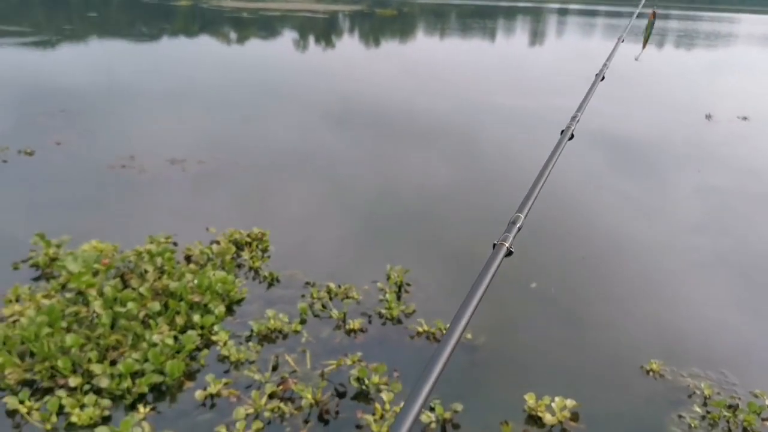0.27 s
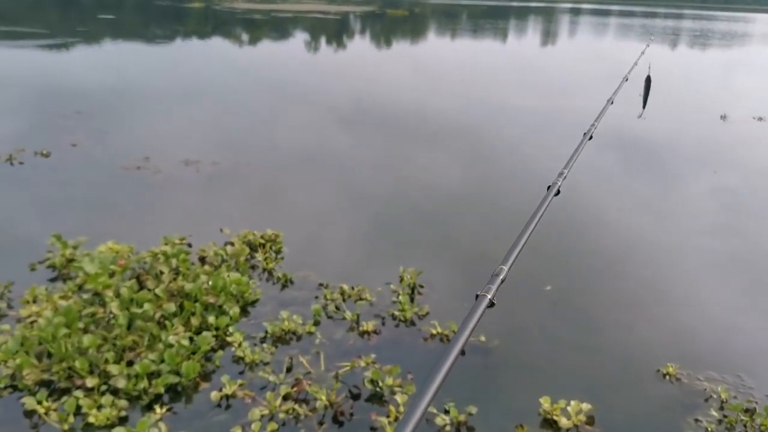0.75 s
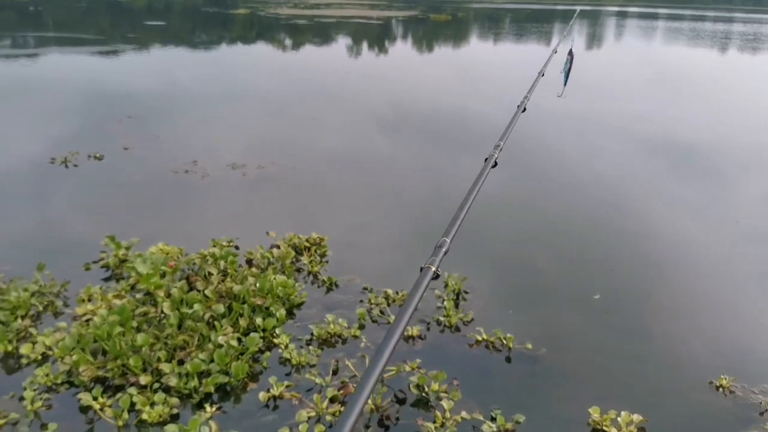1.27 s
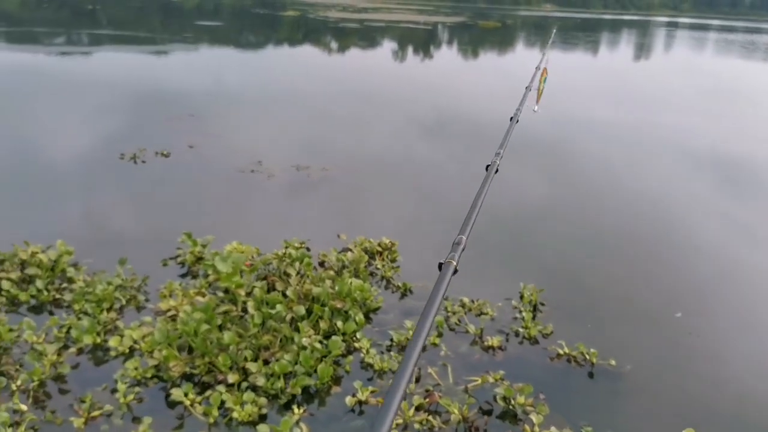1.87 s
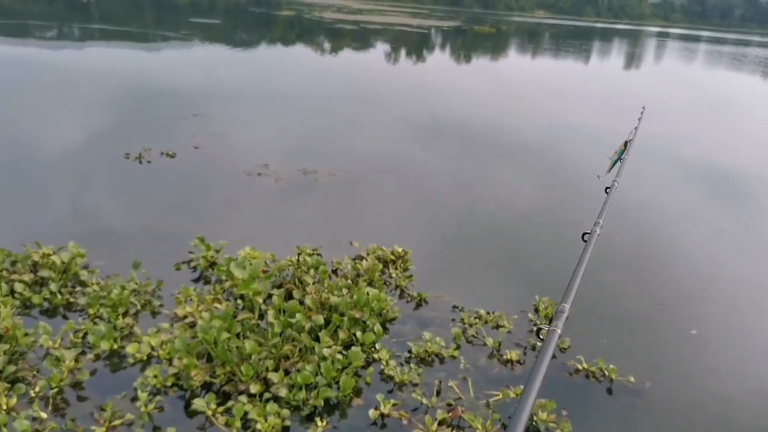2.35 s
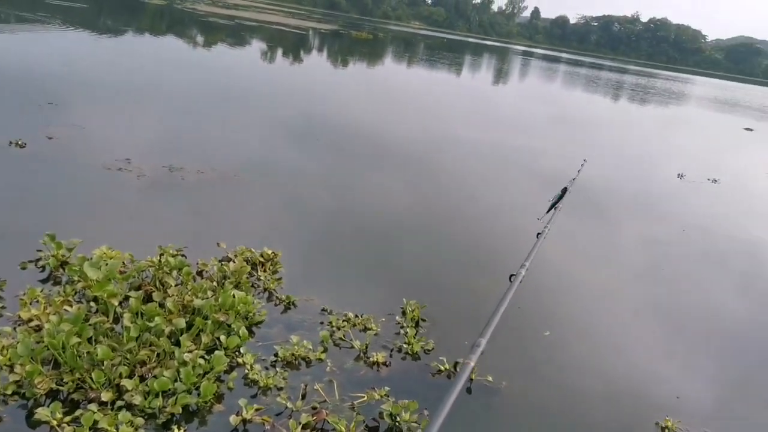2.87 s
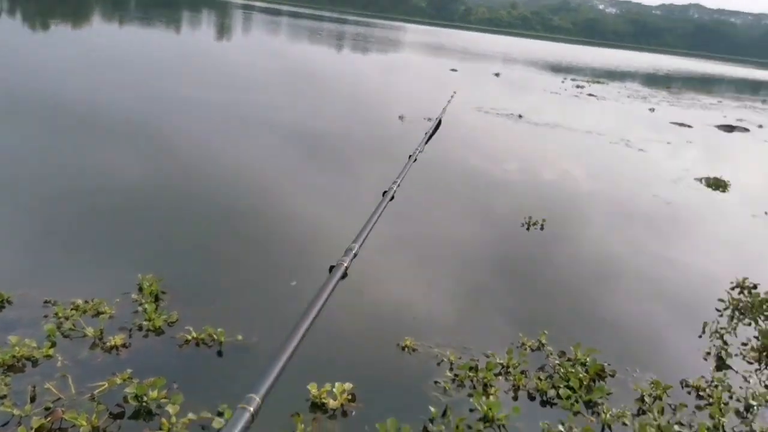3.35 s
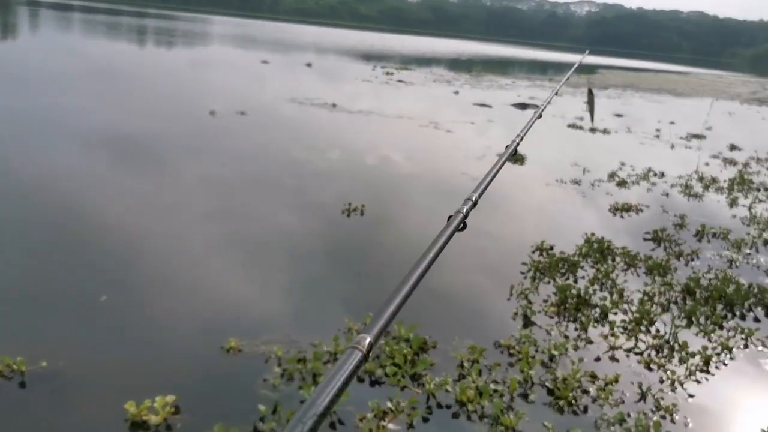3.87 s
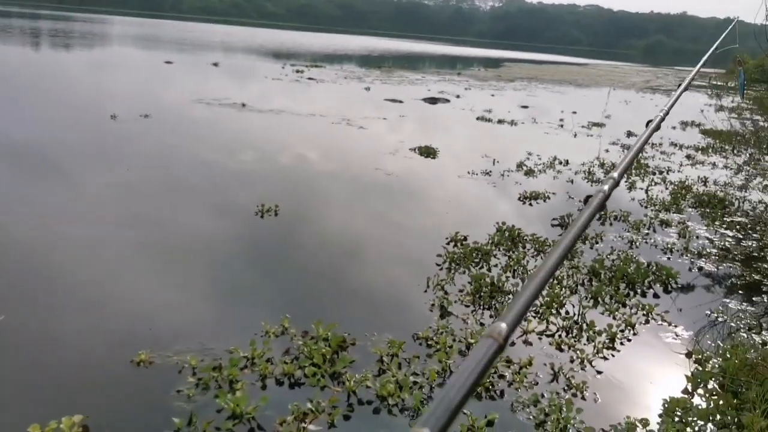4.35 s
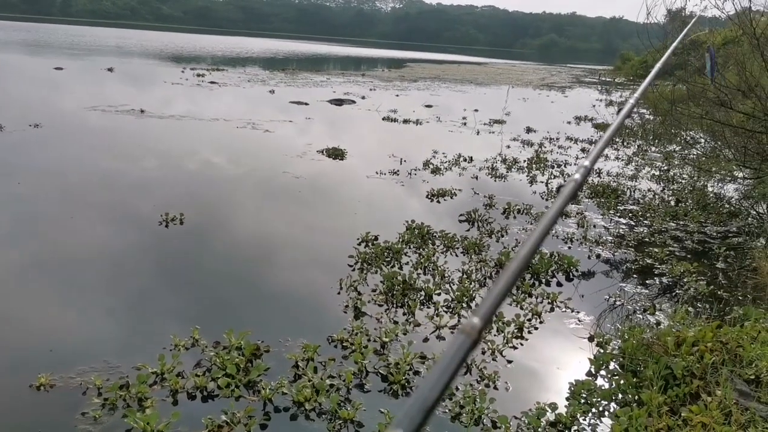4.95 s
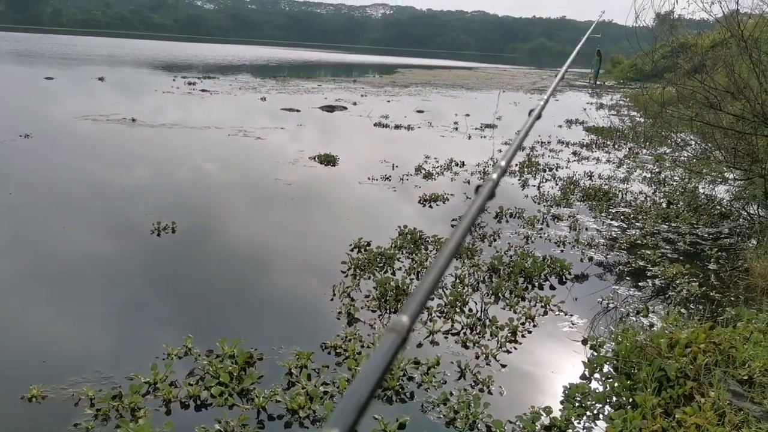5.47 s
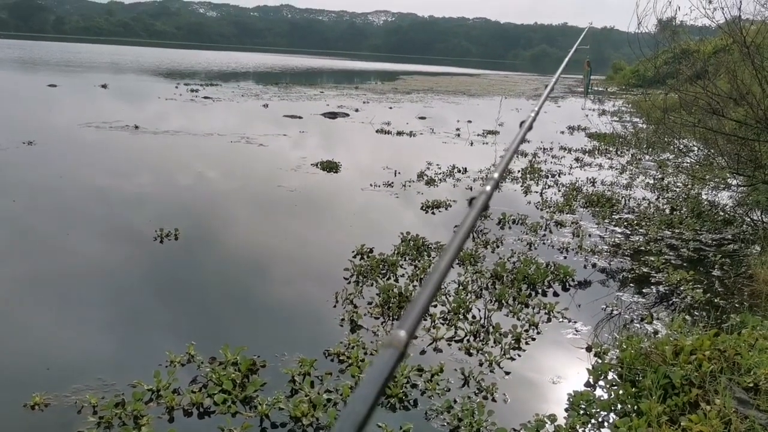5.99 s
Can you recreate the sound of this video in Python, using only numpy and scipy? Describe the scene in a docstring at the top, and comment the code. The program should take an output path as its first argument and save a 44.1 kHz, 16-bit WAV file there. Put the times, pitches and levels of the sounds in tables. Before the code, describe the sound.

Quiet lakeshore insect hum with a fast cricket trill, brief bird whistles and fishing-rod ticks, then a sharp clack, soft camera bumps and dry creaking.

```python
"""A still lake shore, heard at the two ports of a small camera worn by an angler who slowly turns right. From
the start a cricket chirps over throbbing, buzzing katydids (toothy wing noise in narrow bands), an engine drone
(wavering sine orders), air and breeze (filtered noise); clothing rubs, tackle ticks (struck modes) and birds
whistle (gliding sines). Later the left reeds fade, soft bumps knock the camera body and a cicada drone rises;
then bouts of buzzing come from the right, a bird clicks (short ringing tones) and the camera mount creaks."""
import sys
import numpy as np
from scipy import signal
from scipy.fft import rfft, irfft
from scipy.io import wavfile
from scipy.ndimage import uniform_filter1d

SR = 44100
rng = np.random.default_rng(int(sys.argv[2]) if len(sys.argv) > 2 else 0)


def master_out(mix):
    """Clip the mix to full scale and print it as 16-bit PCM to the path in sys.argv[1]."""
    frames = np.transpose(np.atleast_2d(mix))
    ceiling = np.clip(frames, -1, 1)
    pcm = np.round(ceiling * 32767).astype(np.int16)
    wavfile.write(sys.argv[1], SR, pcm)


def volts(x):
    """Linear amplitude factor 10**(x/20) for a level x in dB, scalar or array-like."""
    e = np.asarray(x, float) / 20
    return 10 ** e


N = 274302
T = np.arange(N) / SR

# cricket's pace, near 25 chirps a second: start_s, chirps_sung
CHIRP_COUNT = [(0, .86), (.75, 19.21), (1.25, 32.0), (2.25, 57.25), (3.25, 80.95), (4, 99.9), (5, 124.29),
               (6, 149.17), (6.22, 154.51)]
# crickets: start_s, near_level_db, chorus_level_db
CRICKET_LEVELS = [(0, -63.5, -70), (.4, -65, -68), (.67, -69, -68), (.83, -59.5, -70), (1.35, -57.5, -71),
                  (1.91, -60.5, -79), (2.23, -66, -70), (2.56, -67.5, -72), (2.85, -66, -70),
                  (3.15, -62, -67), (3.5, -65.5, -65.5), (3.84, -71.5, -66), (4.19, -67, -71.5),
                  (4.4, -61, -72.5), (4.7, -58, -66.5), (4.94, -61, -74), (5.3, -60, -69),
                  (5.6, -60, -64.5), (6.1, -60.5, -73.5), (6.14, -76, -72), (6.22, -78, -66)]
# wing strokes of a chirp, before variation: place_in_chirp (0-1), nominal_length_s, top_pitch_hz, relative_db
CRICKET_STROKES = [(.33, .009, 5180, 0), (.63, .0095, 5220, 0), (.92, .009, 4900, -10)]
# left katydid's pace: start_s, throbs_sung
THROB_COUNT = [(0, .01), (.5, 3.75), (2.25, 18.47), (3, 24.95), (4, 33.36), (5, 41.99), (5.5, 46.57),
               (6.22, 52.82)]
# left reeds, fading as the camera turns: start_s, throbbing_db, left_port_buzz_db, right_port_buzz_db
REED_LEVELS = [(0, -66, -65.5, -84), (.66, -64, -65, -87), (1.4, -58.5, -63, -93),
               (1.96, -58.5, -64.5, -93), (2.87, -55, -65, -89), (3.15, -55.5, -68.5, -85),
               (3.43, -63.5, -68.5, -85), (4.04, -69, -72.5, -89), (4.28, -64, -70, -86),
               (4.5, -65, -71.5, -77), (4.8, -64, -73, -89), (4.95, -70, -73.5, -85),
               (5.25, -64.5, -73, -84), (5.85, -71, -73, -79), (6.22, -66, -73.5, -85)]
# steady katydid: start_s, level_against_left_buzz_db
STEADY_LEVEL = [(0, 3), (1.9, 3.5), (2.4, -4), (3.3, -7), (4.4, -5), (5.2, 0), (6.22, 1)]
# right katydid: start_s, level_db
RIGHT_KATYDID_LEVEL = [(0, -75), (1.2, -74), (1.3, -100), (4.8, -100), (5, -80), (6.22, -82.5)]
# far engine: start_s, firing_hz, level_db, second_order_relative_db
ENGINE_COURSE = [(0, 102.1, -52, -12), (.8, 102.6, -50, -23), (1.7, 104.7, -56.5, -11),
                 (2.6, 105.7, -57.5, -13.5), (3.1, 103.6, -60, -12), (3.5, 91.97, -53, -17),
                 (3.9, 77.75, -56, -6), (4.4, 75.2, -62.5, -3), (5, 86.74, -52, -9.5),
                 (5.5, 88.73, -52, -10), (6.22, 90.2, -54.5, -2.5)]
# engine's half orders: multiple_of_firing, relative_db
HALF_ORDERS = [(1.5, -11), (2.5, -13.5)]
# steady far tone, one row: pitch_hz, level_db
FAR_HUM = (396, -67.5)
# colour of far land and air: frequency_hz, relative_density_db (per Hz)
AIR_COLOUR = [(45, -6.5), (65, -2.5), (104, -1), (153, -6), (330, -8), (450, -14.5), (620, -18),
              (1100, -26.5), (1700, -29), (3700, -33), (4600, -37.5), (5500, -60)]
# loudness of that air: start_s, level_db
AIR_LEVEL = [(0, -48), (.33, -49.5), (.73, -52), (2.3, -53), (3.3, -54), (4.4, -54.5), (5.2, -54.5),
             (6.22, -52.5)]
# likeness of the air at the two ports: frequency_hz, left_right_correlation (before clipping to 0-1)
AIR_LIKENESS = [(60, 1), (300, 0.54), (700, 0), (1400, 0)]
# breeze on the ports: start_s, level_db
BREEZE_LEVEL = [(0, -53), (.14, -70), (.42, -52.5), (.71, -76), (1.0, -71), (1.92, -64), (3.2, -65),
                (3.43, -70), (4.04, -53.5), (4.68, -54.5), (5.1, -50), (5.4, -53), (5.63, -57), (5.87, -53),
                (6.0, -56), (6.22, -59)]
# steady treble hiss of the microphones: frequency_hz, left_density_db, right_density_db (dB per Hz)
MIC_HISS = [(4200, -120, -120), (5200, -113, -115), (6100, -120, -122), (6560, -110, -113),
            (6830, -113, -118), (7960, -116, -118), (9350, -115, -116), (11800, -117, -115),
            (12600, -128, -119), (15100, -130, -121), (15500, -140, -135)]
# rubs of clothing: start_s, hold_s, low_level_db, middle_relative_db, left_minus_right_db
CLOTH_RUBS = [(.2, .1, -69, -21, -9), (.52, 0.14, -72, -1.5, -12), (.71, 0.025, -68.5, -3, -10),
              (0.868, 0.027, -74, -20, -11), (1.178, 0.1, -60, -19, -2.5), (1.502, 0.12, -87, -10, 0),
              (1.72, .02, -70, -4, -7), (1.92, 0.11, -70, -11, 1), (2.079, 0.22, -58, -29, -1),
              (2.376, 0.08, -62.5, -15, -1), (2.497, 0.015, -60, -18, -1), (2.591, 0.038, -59.5, -21, 0.5),
              (2.7, 0.17, -72.5, -8, -1), (3.12, 0.52, -76.5, -7, 1), (3.676, 0.13, -67, -6, -1),
              (3.937, 0.078, -64, -20, -1), (4.07, 0.53, -74, -2, -1), (4.87, 0.018, -69, -13, -4),
              (5.032, 0.2, -68.5, -2, -5), (5.317, .05, -65.5, -3, -4), (5.45, .26, -71.5, 1, 0),
              (5.803, 0.15, -72, -0.5, -1), (6.119, .1, -71.5, 2, -2)]
# scrapes of line and reel: peak_s, middle_db, treble_db, rise_s, fall_s (size of the time for 20 dB)
LINE_SCRAPES = [(.05, -83, -73, .05, 0.3), (1.23, -63, -82, 0.033, -0.37), (2.61, -69, -73, .02, .06),
                (3.86, -48.5, -52, 0.017, .013), (3.91, -59.5, -74, 0.035, 0.17),
                (4.835, -51, -53, .1, .03), (4.851, -33, -35.5, 0.022, .011)]
# rod and reel modes: nominal_hz, free_t60_s, relative_db, group (0 body, 1 shell, 2 edge)
ROD_MODES = [(460, 0.03, -10, 0), (893, 0.03, 3, 0), (1047, 0.042, -1.5, 0), (1640, 0.0035, 6.5, 1),
             (2240, 0.0069, 3.5, 1), (2650, 0.0098, -5.5, 1), (3400, 0.0067, -5, 1), (3960, 0.013, -11, 1),
             (6400, 0.0032, 12, 2), (7240, 0.0032, 2, 2), (10660, 0.0061, 1.5, 2)]
# ticks: start_s, body_db, shell_db, edge_db, left_minus_right_db
TACKLE_TICKS = [(.092, -47, -63, -70, -4), (.102, -52, -65, -75, -3), (.147, -53, -70, -73, -12),
                (.519, -55, -50, -76, -7), (.591, -54, -49.5, -74, -8), (.707, -42.5, -35.5, -66, -6),
                (.725, -45, -25, -61, -4.5), (1.211, -49, -52, -65, 4), (1.22, -52, -33.5, -68, -6),
                (1.731, -51, -54, -73, -2), (2.094, -51, -65, -74, 6), (2.101, -47.5, -63, -72, 7),
                (2.377, -52.5, -71, -71, 5), (2.443, -34, -55, -70, 4), (2.503, -53, -45, -68, 2),
                (2.588, -59, -60, -70, 3), (2.611, -46, -57, -53, 8), (2.629, -54, -41, -62, -3),
                (3.729, -64, -54, -81, -1.5), (3.753, -48, -52, -74, -3), (3.787, -53, -68, -71, -6),
                (3.845, -69, -62, -55, -1), (3.857, -50.5, -36.5, -38, -6), (4.336, -62, -68, -80, -2),
                (4.783, -70, -56, -54, 0), (4.795, -70, -50, -48, 0), (4.81, -70, -52, -48, 0),
                (4.845, -56, -40, -44, -4), (4.847, -48, -31, -30, 5), (4.852, -48, -29, -40, -5),
                (5.022, -53, -39.5, -81, -6)]
# falling whistle: start_s, pitch_hz, level_db
FALLING_WHISTLE = [(0.1, 2120, -87), (0.14, 2020, -58), (0.238, 1642, -58), (0.334, 1337, -69),
                   (0.375, 1240, -76)]
# notes of the fluttering bird: start_s, length_s, first_hz, last_hz, top_level_db
WARBLER_NOTES = [(.55, .03, 2750, 2910, -67), (0.581, .02, 2240, 2030, -63), (.985, 0.026, 2910, 2510, -72),
                 (1.032, 0.022, 2640, 2750, -72), (1.06, .05, 2760, 2580, -70),
                 (1.118, .055, 2600, 2600, -68.5), (1.236, 0.032, 2560, 2770, -63),
                 (1.284, 0.031, 2900, 2580, -64), (1.31, 0.054, 2830, 3050, -65),
                 (1.568, 0.024, 2800, 2480, -69)]
# notes of the smooth peeper: start_s, length_s, first_hz, last_hz, top_level_db
PEEPER_NOTES = [(.175, .02, 1950, 2200, -68), (.395, .04, 2820, 2640, -65), (.425, .04, 2640, 2790, -60),
                (.46, .035, 2720, 2640, -68), (.585, .02, 3000, 2750, -68), (.632, .035, 2450, 2120, -66),
                (2.872, .02, 2500, 2800, -59), (4.35, .025, 2560, 2950, -64), (5.19, .05, 3170, 3270, -71),
                (5.39, .06, 3220, 3400, -65), (5.52, .05, 3330, 3270, -69)]
# bumps on the camera body: start_s, drive_db, pitch_hz, left_minus_right_db
BODY_BUMPS = [(3.856, -24.5, 258, -5), (3.956, -40.5, 78, 14), (4.039, -36, 69.4, 23), (4.071, -36, 88, 19),
              (4.114, -42, 89, 19), (4.164, -41, 99, 20), (4.314, -35, 75, 19), (4.484, -38.5, 62, 26),
              (4.519, -37, 59, 23), (4.822, -35, 127, 9), (4.866, -28, 245, 6.5), (5.006, -36.5, 86, 26),
              (5.191, -35, 96, 5), (5.25, -36, 84.5, 14), (5.37, -30, 95, 20.5), (5.5, -41.5, 82.6, 19),
              (5.709, -34, 85.94, 11), (5.858, -35, 83, 13)]
# far cicada drone: start_s, level_db
CICADA_LEVEL = [(4.3, -78), (4.75, -76.5), (4.9, -69), (5, -62), (5.2, -65), (5.4, -64.5), (5.6, -67),
                (5.9, -69), (6.22, -67)]
# right buzzer bouts: start_s, end_s, level_db
BUZZ_BOUTS = [(4.4, 4.67, -81), (4.901, 5.3, -80), (5.399, 5.95, -81), (6.048, 6.3, -85)]
# calls of the clicking bird: start_s, main_click_db, pitch_hz, lead_click_db, following_clicks_db
CLICK_CALLS = [(4.698, -46, 3600, -62, -46), (4.979, -42, 3340, -62, -60), (5.006, -40, 3630, -52, -49),
               (5.287, -42, 3450, -50, -47), (5.596, -37, 3370, -44.5, -44), (5.865, -47.5, 3300, -62, -49),
               (6.134, -45.5, 3300, -59, -50)]
# clicks that follow in a call: delay_s, relative_db, pitch_ratio
CLICK_FOLLOWERS = [(.041, -1, 0.98), (.054, -4, 0.93), (.063, -3.5, 0.95), (.071, -5, .96)]
# loudest creaks in the camera mount: start_s, drive_db, base_hz
LOUD_CREAKS = [(5.027, -31, 560), (5.046, -43, 420), (5.08, -42, 470), (5.094, -40, 400), (5.107, -43, 420),
               (5.142, -32, 350), (5.18, -41, 400), (5.191, -35, 345), (5.21, -38, 640), (5.33, -43, 400),
               (5.404, -41, 470), (5.428, -40, 355), (5.461, -44, 390), (5.566, -40, 445),
               (5.676, -38, 405), (5.708, -43, 480), (5.737, -37, 540), (5.757, -37, 385),
               (5.823, -42, 520), (5.834, -38, 400), (5.846, -34, 360), (5.863, -33, 450),
               (5.875, -36, 610), (5.908, -37, 380), (5.932, -44, 420), (5.949, -44, 420),
               (6.046, -42, 390), (6.121, -40, 400), (6.157, -39, 400), (6.171, -40, 460),
               (6.207, -39, 540)]
# hollow in the right port that cancels one band: frequency_hz, gain_db
RIGHT_PORT_GAIN = [(7000, 1), (7900, -39), (8700, -41), (9500, 0)]

# the left port hears these later by, in s
CRICKET_LAG_S, TACKLE_LAG_S, BANK_LAG_S = .00004, .00008, .00003
CRICKET_PAN_DB, CRICKET_SWAY_DB = -1, 2
SAG_PER_DB, FULL_SONG_DB = .005, -61  # a softer chirp is sung lower
RUB_RISE_S, RUB_FALL_S, RUB_TREBLE_DB = 0.045, 0.081, -18.5  # times for 20 dB
SCRAPE_PAN_DB, CREAK_PAN_DB = -4.5, -2.5
TICK_RING = 0.76  # share of the free ring time left under the hand
NOTE_RISE, NOTE_FALL, NOTE_EDGE_DB = 0.31, 0.31, -14  # rise and fall as shares of a note's length
FLUTTER_HZ, WARBLE_DEPTH, PEEP_DEPTH = 38.6, 0.044, .004  # depths as shares of the pitch
CLICK_LEAD_S = .013


def track(table):
    """Columns of a table, joined by straight lines in time."""
    s, *columns = np.transpose(table)
    return [np.interp(T, s, column) for column in columns]


def band(x, hz, width_hz):
    """Steep band-pass, result at rms 1 over all channels."""
    edges = [max(hz - width_hz / 2, 10), hz + width_hz / 2]
    y = signal.sosfilt(signal.butter(2, edges, "bandpass", fs=SR, output="sos"), x)
    return y / np.sqrt(np.mean(y ** 2))


def pair(alike):
    """Left and right noise whose shared mid sets their correlation."""
    mid, side = rng.standard_normal((2, N))
    alike = np.clip(alike, 0, 1)
    return np.sqrt(1 + alike) * mid + np.sqrt(1 - alike) * side * np.array([[1], [-1]])


def walk(rate):
    """Random levels held 1 / rate s and slewed twice."""
    k = int(SR / rate)
    held = np.repeat(rng.standard_normal(N // k + 1), k)
    return 1.288 * uniform_filter1d(uniform_filter1d(held, k), k)[:N]


def pan(db):
    """Left and right gains, db apart."""
    return volts(np.array([db / 2, -db / 2]))


def add(out, s, sound, db=0.):
    """Mix a short sound in at time s, panned by db."""
    i = int(s * SR)
    out[:, i:i + len(sound)] += pan(db)[:, None] * sound[:N - i]


def late(x, lag_s):
    """Delay the left channel by turning its phases, so parts of a sample are possible."""
    turn = np.exp(-2j * np.pi * np.fft.rfftfreq(N, 1 / SR) * lag_s)
    return np.array([irfft(rfft(x[0]) * turn, N), x[1]])


def ring(hz, t60, sharp=2.53):
    """A struck mode; it builds up over 1 / sharp of a cycle of contact."""
    t = np.arange(int(t60 * SR) + 8) / SR
    contact = 1 - np.exp(-(sharp * hz * t) ** 2)
    return np.sin(2 * np.pi * hz * t) * volts(-60 * t / t60) * contact


def rasp(hz, width_hz, stroke_hz, depth, ringing=0.):
    """Wing teeth hiss in a resonance, opened once a wing stroke; a near wing also rings on a wavering tone."""
    phase = np.cumsum(stroke_hz * (1 + .008 * walk(3))) / SR
    gate = 1 - depth + depth * (1 + np.cos(2 * np.pi * phase)) ** 2 / 2
    tone_hz = hz + 0.28 * width_hz * walk(stroke_hz)
    tone = np.sqrt(2) * np.sin(2 * np.pi * np.cumsum(tone_hz) / SR)
    wing = band(pair(0.4), hz, width_hz) + ringing * tone
    return band(band(wing * gate, hz, 2 * width_hz), hz, 2 * width_hz)


def cricket():
    """Two strong wing strokes and a weak one per chirp, each a tone that arches; others blur into a chorus."""
    db, far_db = track(CRICKET_LEVELS)
    s, count = np.transpose(CHIRP_COUNT)
    near = np.zeros((2, N))
    arch = .24  # the wing is fastest mid-stroke
    for k, chance in enumerate(rng.standard_normal((int(count[-1]), len(CRICKET_STROKES), 3))):
        chirp_at = min(int(np.interp(k, count, s) * SR), N - 1)
        sag = SAG_PER_DB * min(db[chirp_at] - FULL_SONG_DB, 0)
        for (place, length, hz, stroke_db), (pitch_luck, level_luck, time_luck) in zip(CRICKET_STROKES, chance):
            u = np.linspace(-.5, .5, int(length * 1.227 * SR))
            pitch = hz * (1 + sag + 0.01 * pitch_luck - u / 40 - arch * u ** 2)
            tone = np.sin(2 * np.pi * np.cumsum(pitch) / SR) * np.cos(np.pi * u) ** 0.61
            start = max(np.interp(k + place, count, s) - .7 * length + .0005 * time_luck, 0)
            add(near, start, tone * volts(stroke_db + 1.8 * level_luck))
    # grass scatters each stroke differently to each port
    near = near * (1 + .3 * band(pair(.3), 200, 320))
    near = band(late(near, CRICKET_LAG_S), 4670, 740)
    chorus = rasp(4880, 450, 72, .35)
    far = chorus * volts(far_db + 0.35 * walk(17))
    return pan(CRICKET_PAN_DB + CRICKET_SWAY_DB * walk(4.1)) * (volts(db) * near + far)


def left_katydids():
    """A throbbing wing rasp, a steady one beside it, and a broad buzz of two wings at both ports."""
    db, left_buzz_db, right_buzz_db = track(REED_LEVELS)
    left, right = np.eye(2)[:, :, None]
    throb = track(THROB_COUNT)[0] % 1
    # each throb swells slowly and stops short
    shape = np.interp(throb, [0, .1, .25, .55, .8, .89, 1], [.03, .04, .65, .9, .8, .04, .03])
    throbbing = volts(db) * shape * rasp(9680, 450, 130, .85, 1.5)
    steady = volts(left_buzz_db + track(STEADY_LEVEL)[0]) * rasp(9650, 550, 121.5, .6, .7)
    buzz = rasp(11020, 1100, 142, 0.26) + volts(-1.0) * rasp(10690, 1100, 130, 0.35)
    return (throbbing + steady) * left + buzz * (volts(left_buzz_db) * left + volts(right_buzz_db) * right)


def right_katydid():
    """A wing rasp at the right port, opened in 6.4 pulses a second."""
    gate = np.clip(2.5 * np.cos(2 * np.pi * 6.4 * (T - .04)) + .6, 0, 1)
    song = volts(track(RIGHT_KATYDID_LEVEL)[0]) * gate * rasp(11000, 447, 120.0, 0.87, 0.88)
    return song * np.array([[0], [1]])


def engine():
    """Far engine: sines at the firing rate, its double and its half orders, each wavering in level."""
    hz, db, second_db = track(ENGINE_COURSE)
    phase = 2 * np.pi * np.cumsum(hz * (1 + .006 * walk(6))) / SR
    orders = [(1, 0), (2, second_db), *HALF_ORDERS]
    tones = sum(volts(db + order_db + 2.23 * walk(12)) * np.sin(k * phase) for k, order_db in orders)
    return np.sqrt(2) * tones * pan(3.8)[:, None]


def hum():
    """A far tone that wavers in level and pitch."""
    hz, db = FAR_HUM
    tone = np.sin(2 * np.pi * np.cumsum(hz + 1.142 * walk(4.006)) / SR)
    return np.sqrt(2) * volts(db + 2.53 * walk(5)) * tone * pan(9.8)[:, None]


def at_pitch(table, f):
    """A table's second column at f Hz, joined over log frequency."""
    hz, value = np.transpose(table)
    return np.interp(np.log(f), np.log(hz), value)


def far_air():
    """Far land and air: noise bands a third of an octave apart, each wavering, more alike in the lows."""
    air = 0
    for f in 45 * 2 ** np.arange(0, 6.9, 1 / 3):
        noise = band(pair(at_pitch(AIR_LIKENESS, f)), f, f / 4)
        # sqrt(f) turns density into band level
        air = air + volts(at_pitch(AIR_COLOUR, f) + 1.9 * walk(9.3)) * np.sqrt(f) * noise
    return volts(track(AIR_LEVEL)[0]) * air / np.std(air)


def breeze():
    """Moving air rumbles on the ports: deep noise, nearly unrelated left and right."""
    level = volts(track(BREEZE_LEVEL)[0] + 2 * walk(5.07))
    return level * band(pair(0.15), 39.4, 34) * pan(4.9)[:, None]


def mic_hiss():
    """The microphones' own steady treble hiss, unrelated at the two ports."""
    hz, *levels = np.transpose(MIC_HISS)
    f = np.log(np.fft.rfftfreq(N, 1 / SR) + 1)
    shape = [volts(np.interp(f, np.log(hz), db, left=-200, right=-200)) for db in levels]
    return irfft(rfft(rng.standard_normal((2, N))) * shape, N) * np.sqrt(SR / 2)


def swell(start, end, rise, fall):
    """Gain that climbs 20 dB in |rise| s, holds from start to end and drops 20 dB in |fall| s."""
    before = np.maximum(start - T, 0)
    after = np.maximum(T - end, 0)
    return volts(-20 * (before / abs(rise) + after / abs(fall)))


def rubbing():
    """One grainy friction noise in three bands; rubs open mostly the low one, scrapes the upper two."""
    grain_size = np.minimum(rng.exponential(1, N // 64 + 1), 4)
    grains = pair(.3) * volts(3 * np.repeat(grain_size, 64)[:N])
    low, middle = np.zeros((2, 2, N))
    for s, hold, db, middle_db, pan_db in CLOTH_RUBS:
        gain = volts(db) * swell(s, s + hold, RUB_RISE_S, RUB_FALL_S) * pan(pan_db)[:, None]
        low = low + gain
        middle = middle + volts(middle_db) * gain
    treble = volts(RUB_TREBLE_DB) * low
    for s, middle_db, treble_db, rise, fall in LINE_SCRAPES:
        gain = swell(s, s, rise, fall) * pan(SCRAPE_PAN_DB)[:, None]
        middle = middle + volts(middle_db) * gain
        treble = treble + volts(treble_db) * gain
    top = band(band(grains, 7600, 5000), 7600, 5000) * pan(9.2)[:, None]
    return low * band(grains, 1420, 1760) + middle * band(grains, 4150, 2600) + treble * top


def ticks():
    """Rod and reel are struck: each tick rings all their modes, hand-damped and slightly varied."""
    out = np.zeros((2, N))
    for s, *group_db, pan_db in TACKLE_TICKS:
        for hz, t60, mode_db, group in ROD_MODES:
            level_luck, pitch_luck = np.tanh(rng.standard_normal(2))
            mode = ring(hz * (1 + pitch_luck / 20), t60 * TICK_RING)
            add(out, s, volts(group_db[group] + mode_db + 2 * level_luck) * mode, pan_db)
    return out


def birds():
    """Whistles are gliding sines with a little echo; one bird flutters, the others barely waver."""
    out = np.zeros((2, N))
    shape = np.array([0, NOTE_RISE, 1 - NOTE_FALL, 1])
    edge_db = NOTE_EDGE_DB * np.array([1, 0, 0, 1])
    whistles = [(*np.transpose(FALLING_WHISTLE), PEEP_DEPTH)]
    for bird, depth in ((WARBLER_NOTES, WARBLE_DEPTH), (PEEPER_NOTES, PEEP_DEPTH)):
        for s, length, first_hz, last_hz, db in bird:
            glide = first_hz + (last_hz - first_hz) * shape
            whistles.append((s + length * shape, glide, db + edge_db, depth))
    for s, hz, db, depth in whistles:
        t = np.arange(s[0], s[-1], 1 / SR)
        fade = np.minimum(np.minimum(t - s[0], s[-1] - t) / 0.003, 1)
        flutter = 1 + depth * np.sin(2 * np.pi * FLUTTER_HZ * (t - s[0]))
        tone = np.sqrt(2) * np.sin(2 * np.pi * np.cumsum(np.interp(t, s, hz) * flutter) / SR)
        tone = tone * volts(np.interp(t, s, db)) * fade
        add(out, s[0], tone, -2.5)
        add(out, s[0] + .023, 0.29 * tone, 2.5)
    return out


def bumps():
    """Soft knocks on the camera body: dull modes that die within a few cycles."""
    out = np.zeros((2, N))
    for s, db, hz, pan_db in BODY_BUMPS:
        add(out, s, volts(db) * ring(hz, 4.46 / hz, 5.6), pan_db)
    return out


def cicada():
    """A thin far song of wing rasps that comes up as the camera turns toward the bank."""
    rise = np.clip((T - 4.3) / 0.078, 0, 1)
    song = rasp(2630, 300, 160, .3)
    song = song + volts(-5) * rasp(2400, 200, 150, .3) + volts(-7) * rasp(2750, 1100, 140, .3)
    waver = volts(1.5 * walk(30))
    return rise * volts(track(CICADA_LEVEL)[0]) * waver * pan(-3.5)[:, None] * song


def right_buzzer():
    """A narrow wing rasp at the right port, switched on in bouts with 30 ms slopes."""
    bouts = sum(volts(db) * np.interp(T, [a - .03, a, b, b + .03], [0, 1, 1, 0]) for a, b, db in BUZZ_BOUTS)
    return bouts * rasp(10800, 420, 152, .7) * np.array([[0], [1]])


def clicking_bird():
    """Each call is a figure of short ringing clicks: a lead-in, the main click and its followers."""
    out = np.zeros((2, N))
    for s, db, hz, lead_db, tail_db in CLICK_CALLS:
        figure = [(-CLICK_LEAD_S, lead_db, .96), (0, db, 1)]
        figure += [(delay, tail_db + relative_db, ratio) for delay, relative_db, ratio in CLICK_FOLLOWERS]
        for delay, click_db, ratio in figure:
            click = ring(hz * ratio, 0.016)
            fade_in = np.minimum(np.arange(len(click)) / 45, 1)
            add(out, s + delay, volts(click_db) * click * fade_in, -3)
    return out


def creak(hz, upper):
    """A dry, abrupt three-mode knock that dies within a cycle or two."""
    t60 = 3.4 / hz
    return -ring(hz, t60, 12) - upper * (ring(2.3 * hz, t60, 6) + ring(3.9 * hz, t60, 4) / 2)


def mount_creaks():
    """The strained camera mount slips in dry knocks, the loud ones placed and small ones scattered between."""
    out = np.zeros((2, N))
    for s, db, hz in LOUD_CREAKS:
        add(out, s, volts(db) * creak(hz, 0.3), CREAK_PAN_DB)
    # smaller creaks fill the gaps while the mount is strained
    for place, size, tone in rng.random((85, 3)):
        hz = 330 * 2 ** (0.92 * tone)
        add(out, 5.03 + 1.18 * place, volts(-51 + 8.1 * size) * creak(hz, 0.36), CREAK_PAN_DB)
    return out


def scene():
    """Everything at the two ports, the tackle and the bank reaching the left one slightly late."""
    insects_and_hiss = cricket() + left_katydids() + right_katydid() + mic_hiss() + cicada() + right_buzzer()
    distance = engine() + hum() + far_air() + breeze()
    tackle = late(rubbing() + ticks() + mount_creaks(), TACKLE_LAG_S)
    bank = late(birds() + clicking_bird(), BANK_LAG_S)
    return insects_and_hiss + distance + tackle + bank + bumps()


def band_limit(x):
    """A steep low-pass at the top of the band."""
    return signal.sosfilt(signal.butter(12, 14970, fs=SR, output="sos"), x)


def record(dry):
    """The right port sits in a hollow that cancels one treble band."""
    hz, db = np.transpose(RIGHT_PORT_GAIN)
    hollow = volts(np.interp(np.fft.rfftfreq(N, 1 / SR), hz, db))
    mix = np.array([dry[0], irfft(rfft(dry[1]) * hollow, N)])
    return band_limit(mix)


dry = scene()
out = record(dry)
master_out(out)
```